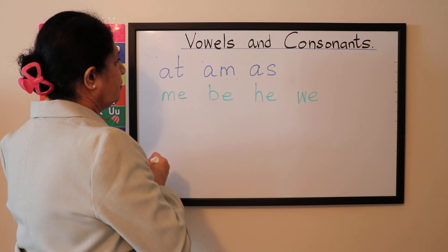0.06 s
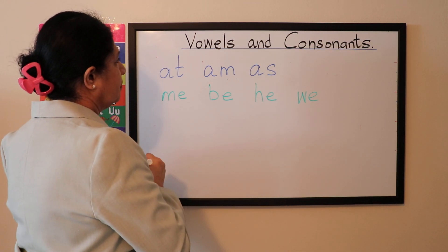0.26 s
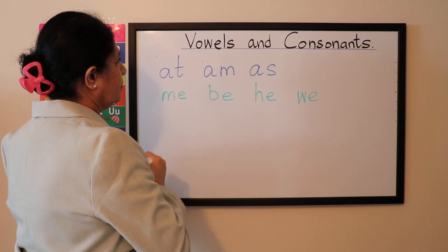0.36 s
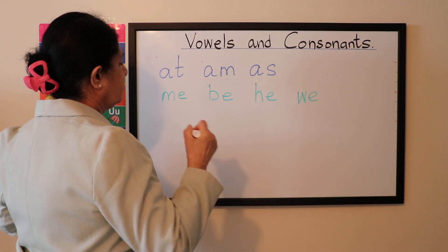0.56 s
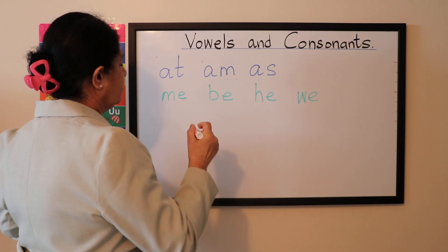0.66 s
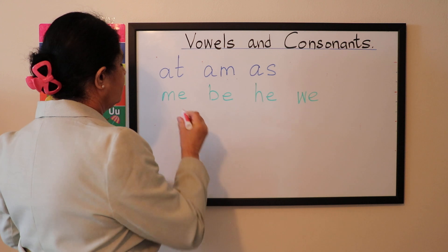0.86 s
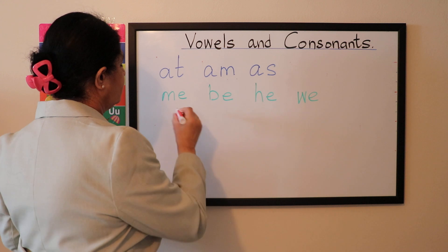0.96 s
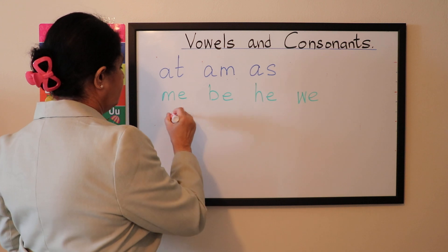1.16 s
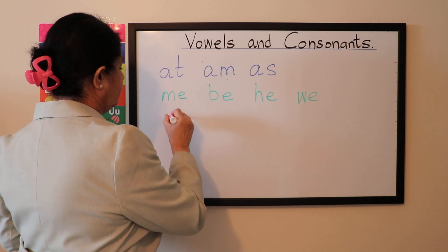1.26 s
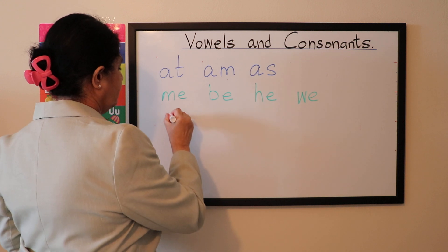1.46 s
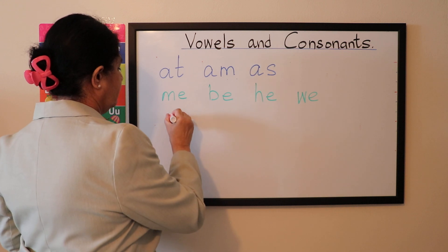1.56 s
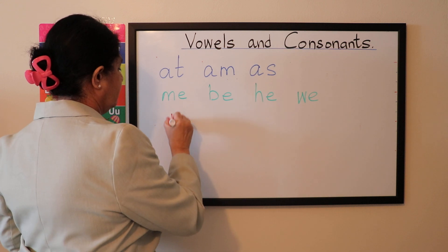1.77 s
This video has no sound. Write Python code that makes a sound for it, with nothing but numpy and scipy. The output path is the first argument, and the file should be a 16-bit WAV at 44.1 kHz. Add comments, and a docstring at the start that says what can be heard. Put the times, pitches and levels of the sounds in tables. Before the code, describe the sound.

A marker is uncapped with a quick clicking creak and soft pop in a small room.

```python
"""A marker's tight plastic cap, twisted off near the microphone and a little to its right.
It creaks in slowing stick-slip clicks, then comes free with a soft pop as air rushes into its hollow.
The place is a small room: a whiteboard and the walls throw each click back. Fingers tick on the
barrel, a sleeve brushes and the tip touches the board, over steady room air and a motor's hum."""
import sys
import numpy as np
from scipy import signal
from scipy.fft import rfft, irfft, next_fast_len
from scipy.io import wavfile
from scipy.ndimage import map_coordinates

SR = 44100
rng = np.random.default_rng(int(sys.argv[2]) if len(sys.argv) > 2 else 0)


def put_to_file(sound):
    """Save the sound as 16-bit audio at rate SR, in the file named by the first command-line argument."""
    columns = np.atleast_2d(sound).T  # one column per channel
    safe = np.clip(columns, -1, 1)
    whole_steps = np.round(safe * 32767)
    wavfile.write(sys.argv[1], SR, whole_steps.astype(np.int16))


N = 79380
SIZE = 4096  # samples in one short sound
TIME_S, SHORT_S = np.arange(N) / SR, np.arange(SIZE) / SR
BINS_HZ = np.fft.rfftfreq(SIZE, 1 / SR)


def amp(db):
    """Decibels to gain."""
    return 10 ** (np.asarray(db) / 20)


def unit(x):
    """Scaled to rms 1."""
    return x / np.sqrt(np.mean(x ** 2) + 1e-20)


def along(points, hz):
    """(Hz, value) points read on a log frequency axis."""
    freqs, values = np.transpose(points)
    return np.interp(np.log(hz + 1), np.log(freqs + 1), values)


def wobble(knots_per_s):
    """A smooth random curve."""
    return map_coordinates(rng.standard_normal(SIZE), [TIME_S * knots_per_s + 2], mode="wrap")


def filtered(x, response):
    """x through a complex frequency response."""
    size = next_fast_len(N + SR // 2)
    return irfft(rfft(x, size) * response(np.fft.rfftfreq(size, 1 / SR)), size)[..., :N]


def click(gain):
    """The shortest causal click with the given spectrum, energy 1."""
    cepstrum = irfft(np.log(np.maximum(gain, 1e-6)))
    cepstrum[1:SIZE // 2] *= 2
    cepstrum[SIZE // 2 + 1:] = 0
    wave = irfft(np.exp(rfft(cepstrum)))
    return wave / np.linalg.norm(wave)


def plastic_click(gain, spread_s):
    """A click smeared by plastic, through which low frequencies travel more slowly."""
    delay_s = spread_s * (1 - BINS_HZ / (SR / 2)) ** 2
    phase = 2 * np.pi * np.cumsum(delay_s) * SR / SIZE
    return irfft(rfft(click(gain)) * np.exp(-1j * phase)) * (np.arange(SIZE) < SIZE // 2)


def add(track, start_s, wave):
    """Mix a wave into the track."""
    i = max(round(start_s * SR), 0)
    track[i:i + len(wave)] += wave[:max(N - i, 0)]


# Likeness of left and right at the microphone: frequency_hz, correlation
STEREO_LIKENESS = [(60, 0.88), (150, 0.79), (380, 0.52), (950, 0.12), (2380, -0.034), (5980, -0.044),
                   (15000, 0.034)]

def stereo_noise(spectrum):
    """Noise from all around, rms 1, nearly mono in the bass."""
    def mid_and_side(hz):
        angle = np.arccos(along(STEREO_LIKENESS, hz)) / 2
        return amp(along(spectrum, hz)) * [np.cos(angle), np.sin(angle)]
    mid, side = filtered(rng.standard_normal((2, N)), mid_and_side)
    return unit(np.array([mid + side, mid - side]))


# Room tone around the microphone: frequency_hz, relative_density_db
AIR_SPECTRUM = [(13, -24), (22, -0.5), (40, -8.5), (58, -1), (82, -8.5), (150, -7.5), (203, -10),
                (290, -13), (489, -12.5), (661, -23), (900, -23), (1250, -20), (2000, -26), (3200, -29),
                (4200, -32), (5100, -35), (7000, -31), (10000, -32), (13000, -37), (15500, -41.5)]

def room_air():
    """The room's air, a low rush of almost steady level."""
    return amp(-49.5 + 0.32 * wobble(9.7)) * stereo_noise(AIR_SPECTRUM)


# Motor tones, alike in both channels: pitch_hz, level_db, waver_depth
MOTOR_TONES = [(118.6, -64, .5), (172.8, -65.5, 1), (234.8, -54.5, .33), (354, -76, 0.16),
               (524, -67.5, 0.66), (701, -66.5, 0.68)]

def motor_hum():
    """A motor hums, each tone wavering in level and phase."""
    out = np.zeros(N)
    for pitch_hz, level_db, depth in MOTOR_TONES:
        waver = 1 + depth * (wobble(15) + 1j * wobble(15))
        tone = np.exp(2j * np.pi * (pitch_hz * TIME_S + rng.random()))
        out += amp(level_db) * unit(np.real(waver * tone))
    return out


# Fingers on the barrel, tip on the board: start_s, knock_db, snap_db
TOUCHES = [(.002, -32.5, -53.5), (.033, -38, -53), (.062, -36.5, -46), (0.065, -31, -48),
           (0.129, -29.5, -44), (.163, -41, -39), (.197, -38, -48), (.229, -31, -59), (.979, -34.5, -42),
           (1.6106, -29.5, -29)]
# Colours of a touch's knock and snap: frequency_hz, relative_db
KNOCK_SPECTRUM = [(200, 4), (700, -6), (1200, 0), (1600, -3), (2000, -3), (2500, 0.5), (2850, -9),
                  (3300, -2), (4800, -16.5), (15000, -24)]
SNAP_SPECTRUM = [(500, -7), (6000, -20), (8400, -10.5), (11000, -17), (15000, -18)]

def touches(knock_t60_s=.009, snap_after_s=.002):
    """Each light touch is a short gritty knock followed by a bright snap."""
    out = np.zeros(N)
    knock_colour = click(amp(along(KNOCK_SPECTRUM, BINS_HZ)))
    snap = click(amp(along(SNAP_SPECTRUM, BINS_HZ)))
    for start_s, knock_db, snap_db in TOUCHES:
        grit = rng.standard_normal(SIZE) * amp(-60 * SHORT_S / knock_t60_s)
        knock = signal.fftconvolve(grit, knock_colour)[:SIZE]
        add(out, start_s, amp(knock_db) * knock / np.linalg.norm(knock))
        add(out, start_s + snap_after_s, amp(snap_db) * snap)
    return out


# Arm movements: centre_s, width_s, level_db
ARM_MOVES = [(.1, 0.2, -85), (.95, 0.28, -60)]
# Colour of rubbing cloth: frequency_hz, relative_density_db
CLOTH_SPECTRUM = [(300, -6.5), (1300, -6.5), (3000, -8.5), (5000, -19), (8500, -13), (15000, -20)]

def sleeve():
    """The sleeve brushes in faint, uneven swells as the arm moves."""
    swell = sum(amp(db) * np.exp(-.5 * ((TIME_S - centre_s) / width_s) ** 2)
                for centre_s, width_s, db in ARM_MOVES)
    return swell * amp(1.1 * wobble(69.9)) * stereo_noise(CLOTH_SPECTRUM)


def resonance(pitch_hz, width_hz, peak_db):
    """The spectral peak of one ring of the cap."""
    return amp(peak_db) / (1 + (2 * (BINS_HZ - pitch_hz) / width_hz) ** 2) ** 2


# Slips of the cap on the barrel: start_s, relative_db
CAP_SLIPS = [(.2363, -11.5), (.2513, -4.5), (.2629, -3.5), (.2713, -5.5), (.2787, -5.5), (.2865, -4.5),
             (.2944, -5.5), (.3032, -6), (.3133, -5), (.3251, -3), (.3374, -4.5), (.3506, -3),
             (.3657, -2.5), (.3815, -1.5), (.3989, .3), (.4216, .7), (.4461, 0)]
# Colour of a slip: frequency_hz, relative_db
SLIP_SPECTRUM = [(100, -12), (600, -19.5), (850, -9), (1100, -11), (1900, -5), (2400, -6.5), (3000, -7),
                 (3900, -4.5), (4900, -15.5), (6500, -7.5), (9000, -8.5), (10700, -9.5), (12000, -1.5),
                 (15500, -17)]
# The cap's ring at the first and last slip: pitch_hz, width_hz, peak_db
CAP_RING = [(6770, 3100, -4.5), (8000, 2500, 11)]
# The hand shades the treble on the microphone's side: frequency_hz, gain_db
HAND_SHADE = [(4000, 4), (8000, 1), (10000, -1), (15000, 4)]

def cap_creak(seated_cut_hz=2000, free_cut_hz=250, vary_db=2.5):
    """The cap sticks and slips; as it slides off it gains body and rings higher and stronger."""
    to_mic, to_board = np.zeros((2, N))
    snap, shade = amp(along(SLIP_SPECTRUM, BINS_HZ)), amp(along(HAND_SHADE, BINS_HZ))
    first_ring, last_ring = np.array(CAP_RING)
    for (start_s, db), slid in zip(CAP_SLIPS, np.linspace(0, 1, len(CAP_SLIPS))):
        ripple = np.interp(BINS_HZ, np.linspace(0, SR / 2, 24), rng.standard_normal(24))
        cut_hz = seated_cut_hz * (1 - slid) + free_cut_hz * slid
        bass_cut = (BINS_HZ ** 2 + (cut_hz / 2) ** 2) / (BINS_HZ ** 2 + cut_hz ** 2)
        body = amp(vary_db * ripple) * bass_cut
        risen = np.sqrt(slid)  # fastest in the first slips
        ring = resonance(*(first_ring * (1 - risen) + last_ring * risen))
        high_ring = slid * resonance(pitch_hz=9080, width_hz=4900, peak_db=20)
        mic_colour = body * (snap + ring) * shade
        board_colour = body * (snap + amp(-15.5) * ring + high_ring)
        add(to_mic, start_s, amp(db) * plastic_click(mic_colour, spread_s=.00045))
        add(to_board, start_s, amp(db) * plastic_click(board_colour, spread_s=.0003))
    return amp(-1.35) * np.array([to_mic, to_board])


# Colour of the cap coming free: frequency_hz, relative_db
POP_SPECTRUM = [(80, -19), (170, -16), (260, -1.5), (420, -4.5), (600, -22), (800, -9.5), (1000, -13.5),
                (1300, -1), (1600, -25), (1950, 7), (2300, -6), (2700, -4.5), (3500, -8), (5000, -9.5),
                (15000, -14)]

def cap_pop(start_s=.448, hollow_hz=1990, hollow_t60_s=.06):
    """Air rushes into the freed cap and rings its hollow."""
    out = np.zeros(N)
    push = plastic_click(amp(along(POP_SPECTRUM, BINS_HZ)), spread_s=.002067)
    hollow = amp(-60 * SHORT_S / hollow_t60_s) * np.sin(2 * np.pi * hollow_hz * SHORT_S)
    add(out, start_s, amp(-5.5) * push + amp(-41) * hollow)
    return out


# Echoes at the microphone, nearest surface first: delay_ms, left_db, right_db, left_lead_ms
EARLY_ECHOES = [(1.2, -10, -5, 0), (1.5, -10, -6, .05), (4.2, -2, -3, .02), (4.84, -1.5, 1, .02),
                (5.5, -14, -7, .05), (11.6, -9, -16, .2), (17.45, -11, -8, .02), (18.7, -15, -12, -.1)]

def early_echoes(x):
    """Distinct reflections from the board and the nearest surfaces."""
    sides = np.array([[-.5], [.5]])
    return filtered(x, lambda hz: sum(
        amp([[left_db], [right_db]]) * np.exp(-2j * np.pi * hz * (delay_ms + sides * lead_ms) / 1000)
        for delay_ms, left_db, right_db, lead_ms in EARLY_ECHOES))


# Decay of the small room: frequency_hz, t60_s
ROOM_DECAY = [(200, 0.32), (1000, 0.49), (2000, 0.37), (4000, 0.33), (8000, 0.24), (15000, 0.22)]

def room_reverb(x, build_s=.0027, scatter_t60_s=.053):
    """Dense scatter from nearby things, then a tail that dies sooner in the treble."""
    hz, frame_s, noise = signal.stft(rng.standard_normal((2, SR // 2)), SR, nperseg=256)
    decay = amp(-60 * frame_s / along(ROOM_DECAY, hz)[:, None])
    tail = signal.istft(noise * decay, SR, nperseg=256)[1]
    t = np.arange(tail.shape[1]) / SR
    tail *= 1 - np.exp(-t / build_s)
    scatter = rng.standard_normal(tail.shape) * amp(-60 * t / scatter_t60_s)
    response = amp(2.5) * tail / np.linalg.norm(tail[0])
    response += amp(0.5) * scatter / np.linalg.norm(scatter[0])
    return signal.fftconvolve(x[None], response, axes=1)[:, :N]


def scene(drift_hz=2.2):
    """The marker, just right of the microphone; the room's echoes drift as hands and body move."""
    to_mic, to_board = cap_creak()
    handling = cap_pop() + touches()
    direct = (to_mic + handling) * amp([[-1.6], [1.6]])
    echoes = early_echoes(to_board + amp(-4.5) * handling)
    to_room = 0.92 * to_mic + 0.18 * to_board + handling
    drift = 2 * np.pi * drift_hz * TIME_S  # crossfades two random echo patterns
    reverb = room_reverb(to_room * np.cos(drift)) + room_reverb(to_room * np.sin(drift))
    return direct + echoes + reverb * amp([[-1.3], [1.1]]) + motor_hum() + room_air() + sleeve()


def record(dry):
    """The recorder cuts off steeply at its band limit."""
    limit_hz = 15900
    return filtered(dry, lambda hz: 1 / (1 + (hz / limit_hz) ** 200))


dry = scene()
out = record(dry)
put_to_file(out)
```